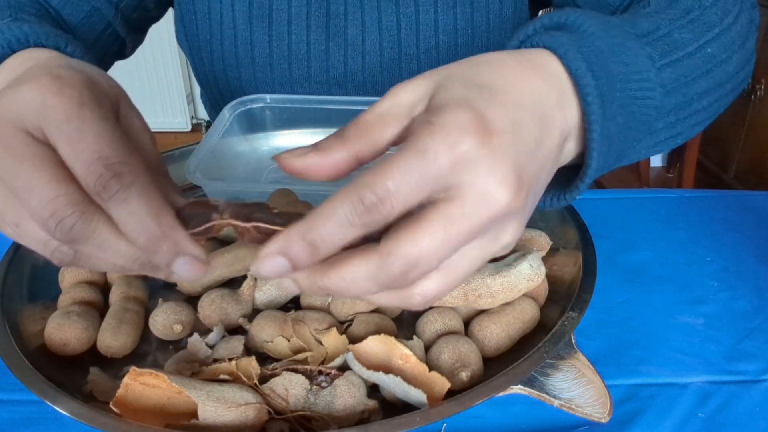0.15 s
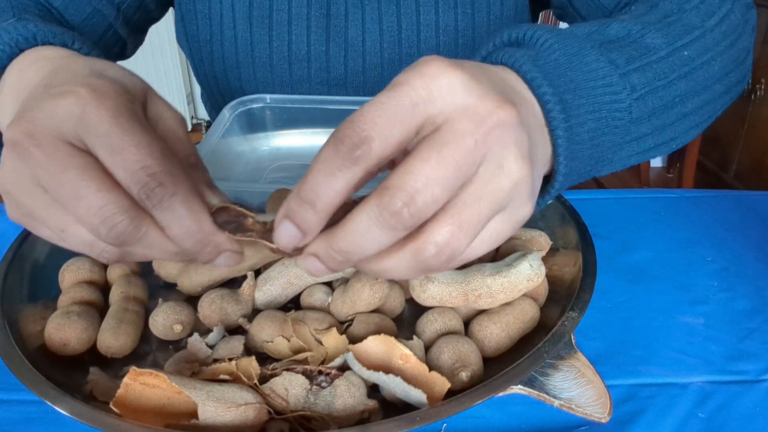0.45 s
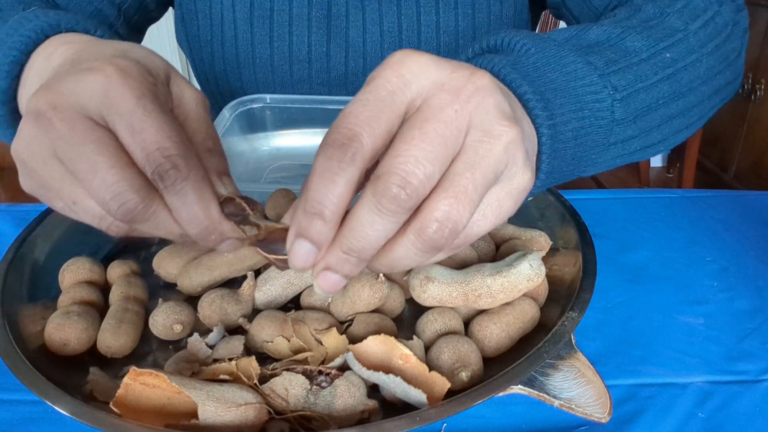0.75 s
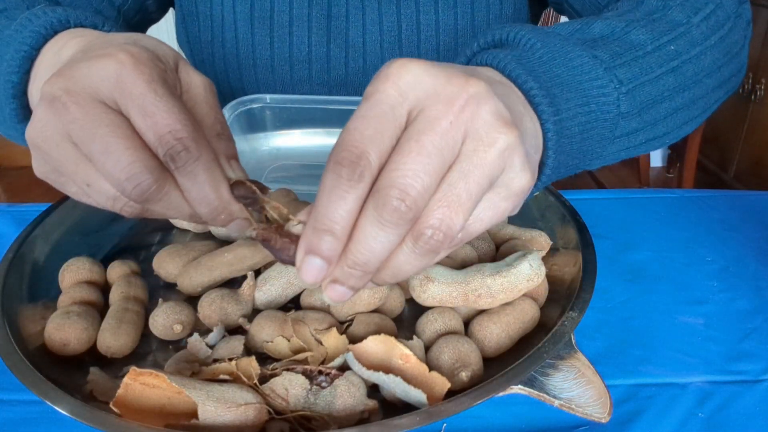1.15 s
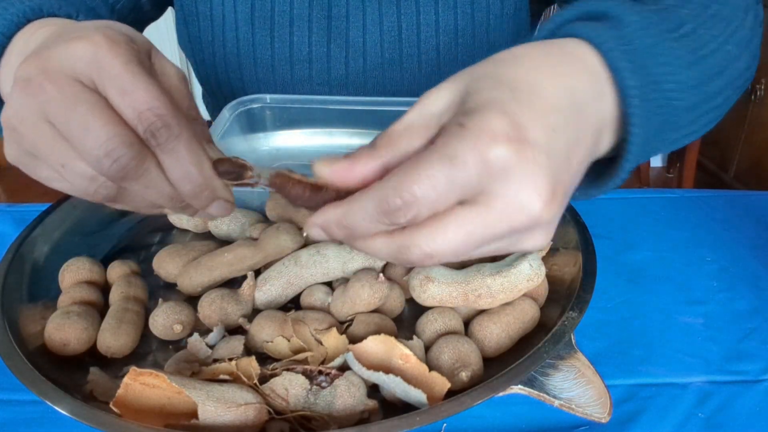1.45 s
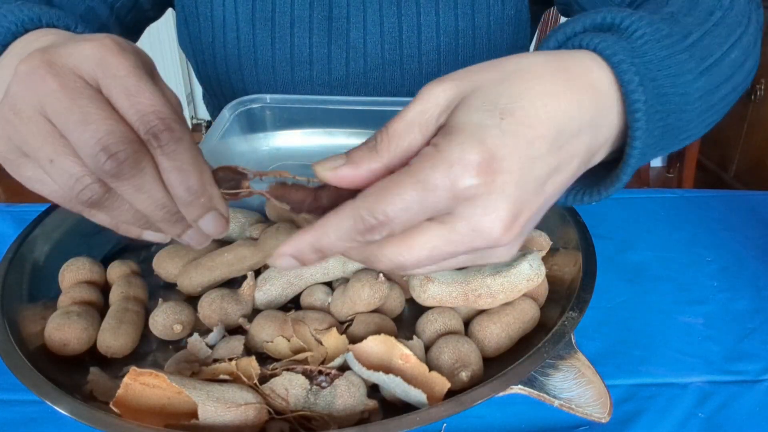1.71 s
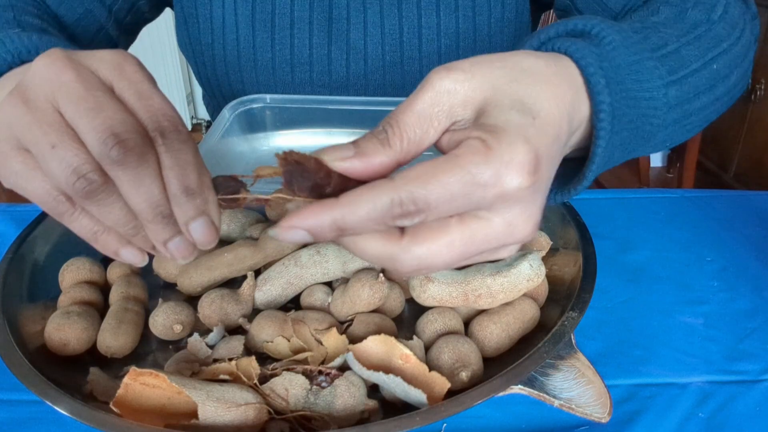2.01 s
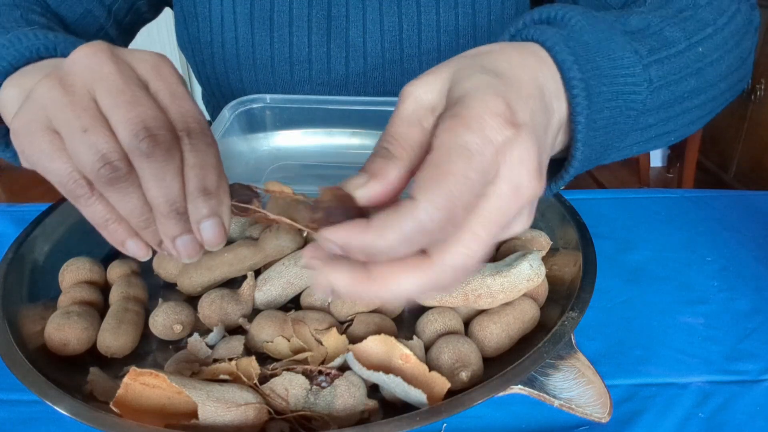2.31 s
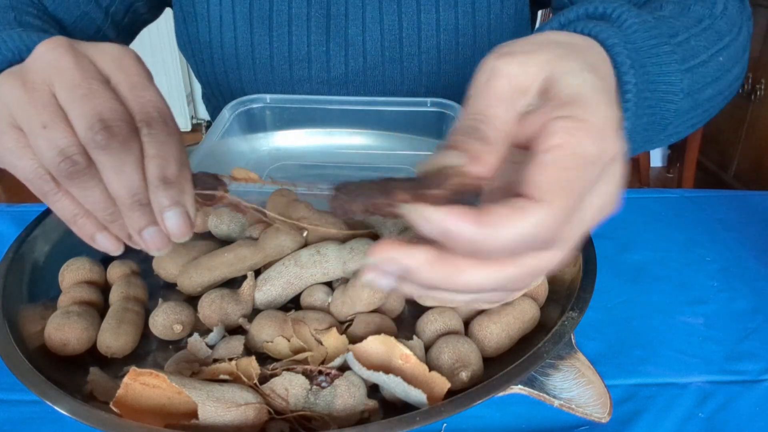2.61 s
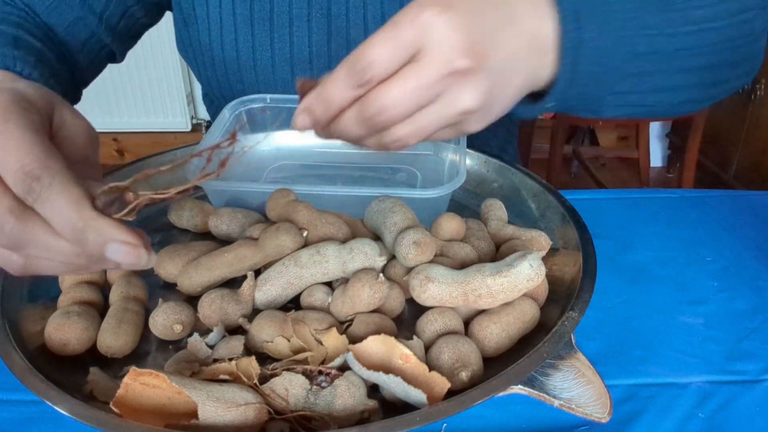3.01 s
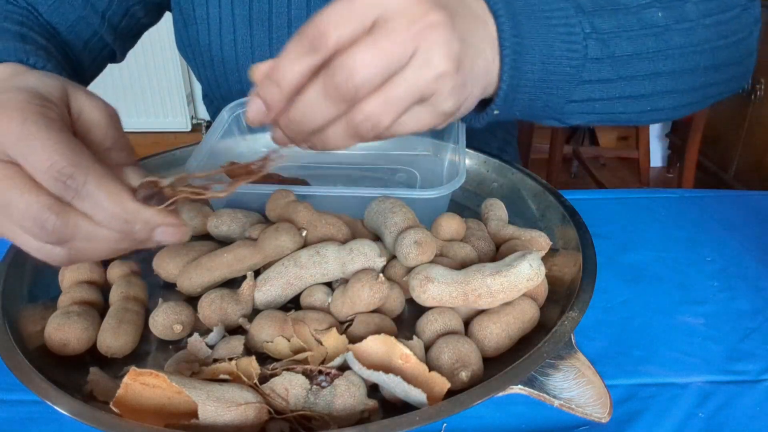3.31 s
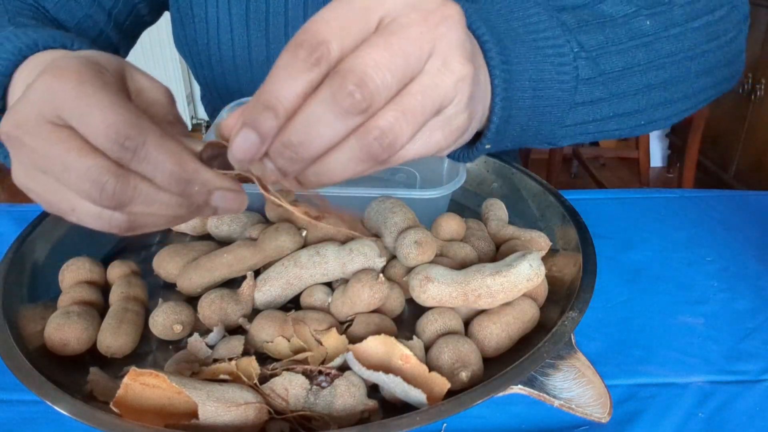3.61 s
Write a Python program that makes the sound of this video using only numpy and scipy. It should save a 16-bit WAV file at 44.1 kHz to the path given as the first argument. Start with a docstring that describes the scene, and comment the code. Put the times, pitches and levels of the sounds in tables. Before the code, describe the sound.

Brittle pod shells crack under fingers, close up in stereo in a small kitchen. Faint ticks come at 0.3 s, light snaps around 0.9-1.2 and 2.05 s, then the sharpest cracks at 2.4 and 2.65-2.7 s with dry crumbling. At 3.3 s a hard object clatters rapidly on steel, slightly farther off, ringing briefly. Low hum and soft room noise continue underneath throughout.

```python
"""A small kitchen: fingers crack and peel brittle pod shells close to a stereo microphone.
Each crack is a sharp snap with short splinter noise, then crumbling noise. Near the end something
hard drops and clatters on steel, a little way off: noise bursts, and decaying modes that ring out.
A refrigerator-like hum and a slow fan (sines) and soft room noise (shaped noise) lie underneath."""
import sys
import numpy as np
from scipy import signal
from scipy.io import wavfile
from scipy.ndimage import uniform_filter1d

SR = 44100
rng = np.random.default_rng(int(sys.argv[2]) if len(sys.argv) > 2 else 0)


def persist_wave(psi):
    """Save psi, clipped to +-1, as 16-bit WAV."""
    counts = np.round(np.clip(psi, -1, 1) * 32767).astype(np.int16)
    wavfile.write(sys.argv[1], SR, np.atleast_2d(counts).T)


N = 165375

# Mains hum: (frequency [Hz], rms level [dB])
HUM = [(49.04, -73), (99.93, -62.5), (199.9, -78.5)]
# Fan harmonics: (multiple of FAN_HZ, rms level [dB])
FAN = [(4, -88), (5, -78), (7, -78), (8, -91.5), (10, -82.5), (11, -82), (13, -86.5), (14, -86), (16, -83)]
FAN_HZ = 32.65
HUM_WAVER_DB, LOW_HUM_WAVER_DB = -0.63, 1.5   # the low one is for tones under 60 Hz

# Spectrum of the room noise: (frequency [Hz], relative level per hertz [dB])
AIR = [(25, -45.5), (45, -6.5), (70, -6.5), (100, 1.5), (160, -5), (300, -8.5), (520, -13), (800, -21),
       (1500, -26.5), (3000, -34), (6500, -37.5), (8500, -44), (15500, -45)]
AIR_DB = -66.5   # rms level

# Left-right likeness of diffuse sound: (frequency [Hz], correlation [-1 to 1])
LIKENESS = [(60, 0.68), (130, 0.97), (290, 0.67), (640, -0.11), (1410, -0.086), (3100, -0.095),
            (6820, -0.069), (15000, 0.028)]
EDGES = 22 * 2 ** np.arange(0, 9.8, .4)   # band edges of diffuse sound [Hz]

# Reverberation of the room: (frequency [Hz], time to fall 60 dB [s])
ROOM_T60 = [(100, 0.52), (500, 0.46), (1500, 0.43), (4000, 0.38), (12000, 0.26)]
ROOM_DELAY_S, CLATTER_ROOM_DB, RING_ROOM_DB, CRACK_ROOM_DB = 0.006, -10, -14.5, -18.5

# Blows of the clatter: (time [s], knock level [dB], steel ring level [dB], low thud level [dB])
BLOWS = [(3.324, -32.5, -57, -33), (3.331, -24, -25.5, -22.5), (3.342, -33.5, -46, -33.5),
         (3.352, -25.5, -33.5, -36.5), (3.357, -25, -24.5, -31.5), (3.370, -27, -35.5, -31),
         (3.379, -27.5, -23, -26), (3.388, -36, -41.5, -28), (3.394, -42.5, -36.5, -35.5),
         (3.410, -41, -42.5, -48), (3.428, -50, -53.5, -56)]
# Spectrum of the knocks: (frequency [Hz], relative level per hertz [dB])
KNOCK = [(500, -8.5), (800, -4.5), (1050, -7), (1600, 0), (2600, -2.5), (3600, -11), (4400, -16),
         (5600, -11), (7000, -17.5), (11000, -21.5), (13000, -32), (16000, -38)]
# Spectrum of the thuds: (frequency [Hz], relative level per hertz [dB])
THUD = [(40, -17.5), (75, -24), (130, 9), (230, 3), (450, 5), (700, 4.5), (1200, -21)]
KNOCK_RISE_S, KNOCK_T60_S, THUD_T60_S = 0.0043, 0.067, 0.047   # the thuds share the rise
KNOCK_SPREAD, THUD_SPREAD = 0.92, 0.31   # share of a diffuse sound's left-right difference
GRAIN_DB, GRAIN_HZ = 1.5, 254   # unevenness of the whole burst
PATCH_DB, PATCH_HZ = 4, 40   # each band flickers on its own

# Modes of the steel: (frequency [Hz], relative level [dB], time to fall 60 dB [s],
# left-right level [dB], growth in strength from earlier to later blows [dB/s])
STEEL = [(234.5, -22, 0.34, 1, -2), (379.6, -20, 0.27, -2, 2), (464, -13.5, 0.07, -0.5, -2),
         (631, -13, 0.094, -1, -6), (1235, -21.5, 0.42, 4.5, -6.5), (1277, -15.5, 0.085, -3.5, 1.5),
         (1626, -10.5, 0.075, 8.5, -6), (1776.5, -15, 0.63, 1.5, 15), (1805, -16.5, 0.14, 11, -6),
         (2368, -1, 0.15, -4, 22), (2400, -18, 0.4, 7.5, -4), (2430, -7.5, 0.13, -11.5, 13),
         (2500, -14.5, 0.24, -2.5, -1.5), (2640, -10, 0.2, -8, 48), (2954, -14.5, 0.23, 11.5, -3),
         (2966, -12, 0.18, -11, 48), (3886, -25, .25, 6.5, 2), (4065, -21.5, 0.15, -8.5, -5),
         (4180, -15, 0.11, 12, 19.5), (4630, -21.5, 0.15, 11, 8.5)]
MODE_SCATTER_DB, RING_RISE_S = 2, 0.0046
FULL_TURN_HZ = 2150   # from here up the ports hear a mode a quarter cycle apart
RATTLE_RAD, RATTLE_HZ = .4, 25
RATTLE_T60_S = .25   # the rattling settles after the last blow and the ring clears
FADE_S, FADE_DB_PER_S, FADE_DEPTH_DB = 3.64, -250, -8   # the clatter's tail sinks by a step

# Shell cracks, each sounding CRACK_OFFSET_S after its listed time:
# (time [s], relative level [dB], brightest pitch [Hz], middle part re brightest [dB],
# dull part re brightest [dB], crumbling gain [dB], left-right level [dB])
CRACKS = [(0.3167, -64.5, 4260, 4, -30, -31, 2), (0.3599, -65.5, 9000, -8, -20, -21, -1),
          (0.768, -69, 5500, -26, -25, -25, 0), (0.8688, -47.5, 12200, -20, -23, -28, 0),
          (0.9238, -60, 14700, -22, -20, -19, 1.5), (0.9926, -59, 12600, -11, -15, -23, -1.5),
          (1.078, -48.5, 10500, -36, -25, -28, 0.5), (1.1144, -72, 6650, -17, -18, -25, 2),
          (1.1762, -66.5, 11500, -13, -20, -23, 0), (1.233, -50.5, 12900, -27, -24, -29, 1),
          (1.4875, -75, 6430, -17, -13, -25, 5), (2.0475, -46, 9800, -12.5, -15.5, -25, 1),
          (2.3537, -69, 9800, -11, -2, -7, 0.5), (2.4209, -33.5, 11200, -13.5, -20, -26, 0.5),
          (2.6477, -37.5, 7600, -21, -21.5, -21, 0), (2.6721, -36, 11700, -18, -22, -26, -1),
          (2.6973, -53, 11900, -19, -20, -13.5, 2.5), (2.7138, -67.5, 14000, 5, 2, -16, -5),
          (2.966, -71.5, 12200, -11, -20, -3.5, 0), (2.977, -74, 12200, -11, -18, -18, 2),
          (3.6995, -62, 15100, -17, -25, -14, -5)]
CRACK_OFFSET_S = 0.0011
EARLIER_CRACK_S, EARLIER_CRACK_DB = 0.015, -44   # this long before the start; only its tail is heard
LEAD_IN_S, LEAD_IN_DB_PER_S = .004, 5004   # very short noise ahead of the snap
SPLINTER_DB, SNAP_T60_S, SNAP_Q, SNAP_BROAD_DB = -19, 0.017, 1.8, -1
CRUMBLE_RISE_S, CRUMBLE_T60_S, CRUMB_DB, DULL_TAIL_DB = 0.0067, 0.1, 2, 0.5
DULL_LOW_HZ, DULL_HIGH_HZ, MIDDLE_HIGH_HZ = 635, 2250, 6500
LEFT_LAG_S = .00018   # the hands are nearer the right port
DULL_LAG_S = .00006   # left lag of the two lower registers

MIC_LOW_HZ, CUTOFF_HZ = 40.3, 16200


def amp(db):
    """Level: 20 dB is a factor of ten in amplitude."""
    return 10 ** (np.asarray(db) / 20)


def rms_one(x):
    """Normalisation to unit root-mean-square."""
    return x / np.sqrt(np.mean(x ** 2) + 1e-20)


def at_hz(points, hz):
    """Interpolation of a curve along logarithmic frequency."""
    points = np.array(points)
    return np.interp(np.log(hz), np.log(points[:, 0]), points[:, 1])


def drift(rate):
    """Slow random wander: white noise through a two-pole low-pass at rate [Hz], unit rms."""
    step = 40   # samples between the points of the wander
    r = np.exp(-2 * np.pi * rate * step / SR)
    white = rng.standard_normal(N // step + 2002)
    slow = signal.lfilter([1], [1, -2 * r, r * r], white)[2000:]
    return np.interp(np.arange(N) / step, np.arange(len(slow)), rms_one(slow))


def band(x, low_hz, high_hz):
    """Band-pass filtering between two frequencies."""
    sos = signal.butter(2, [low_hz, min(high_hz, .45 * SR)], "band", fs=SR, output="sos")
    return signal.sosfilt(sos, x)


def dying(t, t60):
    """Exponential decay from t = 0, losing 60 dB in t60; silence before."""
    return (t >= 0) * amp(-60 * np.maximum(t, 0) / t60)


def diffuse(size, gain, spread=1):
    """Partial coherence: in each band, mid and side noise are mixed to the wanted correlation."""
    settle = 8000   # samples for the filters to settle
    white = rng.standard_normal((2, 2, size + settle))
    out = 0
    for k, (low, high) in enumerate(zip(EDGES, EDGES[1:])):
        # neighbouring bands use different noise
        mid, side = band(white[k % 2], low, high)[:, settle:]
        hz = np.sqrt(low * high)
        alike = np.clip(1 - spread * (1 - at_hz(LIKENESS, hz)), -1, 1)
        out = out + gain(hz) * (np.sqrt(1 + alike) * mid + np.sqrt(1 - alike) * side * [[1], [-1]])
    return out


def air():
    """Stationary diffuse noise: room noise with a fixed spectrum."""
    return amp(AIR_DB) * rms_one(diffuse(N, lambda hz: amp(at_hz(AIR, hz))))


def hum():
    """Periodic sources: mains and fan tones are sums of sines whose levels waver a little."""
    t = np.arange(N) / SR
    fan = [(k * FAN_HZ, db) for k, db in FAN]
    out = 0
    for hz, db in list(HUM) + fan:
        waver = LOW_HUM_WAVER_DB * drift(0.19) if hz < 60 else HUM_WAVER_DB * drift(1.3)
        # sqrt(2) turns rms into peak
        out = out + np.sqrt(2) * amp(db + waver) * np.sin(2 * np.pi * (hz * t + rng.random()))
    return out


def room(x):
    """Reverberation: convolution with a unit-energy diffuse tail whose bands decay at their own rates."""
    t = np.arange(SR // 2) / SR - ROOM_DELAY_S

    def decay(hz):
        t60 = at_hz(ROOM_T60, hz)
        return dying(t, t60) / np.sqrt(t60)

    tail = diffuse(len(t), decay)
    tail = tail / np.sqrt(np.sum(tail ** 2) / 2)
    return signal.fftconvolve(x[None], tail, axes=1)[:, :N]


def bursts(column, spectrum, t60, spread):
    """Impact noise: each blow excites a short burst of rattling, spectrally shaped noise."""
    t = np.arange(N) / SR
    shape = 0
    for blow in BLOWS:
        since = t - blow[0]
        rise = np.clip(since / KNOCK_RISE_S, 0, 1) ** 2
        shape = shape + amp(blow[column]) * rise * dying(since, t60)
    grain = amp(GRAIN_DB * drift(GRAIN_HZ))
    noise = diffuse(N, lambda hz: amp(at_hz(spectrum, hz) + PATCH_DB * drift(PATCH_HZ)), spread)
    return shape * grain * rms_one(noise)


def clatter():
    """Superposition of the bright knocks and low thuds of the same blows."""
    knocks = bursts(1, KNOCK, KNOCK_T60_S, KNOCK_SPREAD)
    return knocks + bursts(3, THUD, THUD_T60_S, THUD_SPREAD)


def steel():
    """Modal vibration: every blow adds energy to every damped mode; rattling shakes the phase."""
    s, _, ring_db, _ = np.transpose(BLOWS)
    first = int(s[0] * SR)
    out = np.zeros((2, N))
    t = np.arange(first, N) / SR
    since = t - s[:, None]
    scatter = rng.normal(0, MODE_SCATTER_DB, (len(BLOWS), len(STEEL)))
    rise = np.clip(since / RING_RISE_S, 0, 1)
    settling = amp(-60 * np.maximum(t - s[-1], 0) / RATTLE_T60_S)
    for k, (hz, db, t60, pan_db, later_db) in enumerate(STEEL):
        struck = amp(db + ring_db + later_db * (s - s.mean()) + scatter[:, k])[:, None]
        height = np.sqrt(np.sum((struck * rise * dying(since, t60)) ** 2, axis=0))
        # the two ports hear the mode at opposite phase offsets
        turn = np.pi / 4 * min(hz / FULL_TURN_HZ, 1) * (-1) ** k * np.array([[1], [-1]])
        phase = 2 * np.pi * (hz * t + rng.random())
        rattle = RATTLE_RAD * drift(RATTLE_HZ)[first:] * settling
        pan = amp(pan_db * np.array([[.5], [-.5]]))
        out[:, first:] += pan * height * np.sin(phase + rattle + turn)
    return out


def snap(t, grit, hz, middle_db, dull_db):
    """Brittle fracture: an impulse with short splinter noise, band-passed into peak-scaled registers."""
    lead_in = amp(LEAD_IN_DB_PER_S * np.minimum(t, 0) - 2.0)
    shape = np.where(t < 0, lead_in, dying(t, SNAP_T60_S))
    click = (t == 0) + amp(SPLINTER_DB) * grit * shape
    w = 2 ** (.5 / SNAP_Q)
    bright = band(click, hz / w, hz * w) + amp(SNAP_BROAD_DB) * band(click, MIDDLE_HIGH_HZ, 21800)
    middle = band(click, DULL_HIGH_HZ, MIDDLE_HIGH_HZ)
    dull = band(click, DULL_LOW_HZ, DULL_HIGH_HZ)
    levels = zip([0, middle_db, dull_db], [bright, middle, dull])
    return [amp(db) * part / abs(part).max() for db, part in levels]


def crumbling(t, grit, lump_noise, middle_db, crumble_db):
    """Granular friction: lumpy band-passed noise swells after the snap and dies."""
    lower = amp(middle_db + DULL_TAIL_DB) * band(grit, DULL_LOW_HZ, MIDDLE_HIGH_HZ)
    hiss = band(grit, 4050, 12000) + lower
    lumps = amp(CRUMB_DB * rms_one(uniform_filter1d(lump_noise, size=90)))
    swell = np.clip(t / CRUMBLE_RISE_S, 0, 1) ** 2
    return amp(crumble_db) * hiss * lumps * swell * dying(t, CRUMBLE_T60_S)


def cracks():
    """Arrival time and level differences: each crack reaches the right port first, at its own balance."""
    lead, before = SR // 10, int(LEAD_IN_S * SR)
    t = (np.arange(SR // 6) - before) / SR
    out = np.zeros((2, N + SR))
    earlier = (-EARLIER_CRACK_S, EARLIER_CRACK_DB, 6500, -4, -16, -13, 0)
    for s, db, hz, middle_db, dull_db, crumble_db, pan_db in [earlier] + list(CRACKS):
        grit = rng.standard_normal((5, len(t)))
        top, middle, dull = snap(t, grit[:2], hz, middle_db, dull_db)
        crumbs = crumbling(t, grit[2:4], grit[4], middle_db, crumble_db)
        for c in (0, 1):   # left, right
            # the middle register has inverted polarity
            for part, lag in [(top + crumbs, LEFT_LAG_S), (dull - middle, DULL_LAG_S)]:
                i = lead - before + int((s + CRACK_OFFSET_S + lag * (1 - c)) * SR)
                out[c, i:i + len(t)] += amp(db + 5.0 + pan_db * (1.5 - c)) * part[c]
    return out[:, lead:lead + N]


def scene():
    """Superposition of direct sound, reverberation and background."""
    noise = air()
    shells, ring, blows = cracks(), steel(), clatter()
    # the right channels feed the room
    send = amp(CRACK_ROOM_DB) * shells[1] + amp(CLATTER_ROOM_DB) * blows[1] + amp(RING_ROOM_DB) * ring[1]
    wet = room(send)
    fade = amp(np.clip(FADE_DB_PER_S * (np.arange(N) / SR - FADE_S), FADE_DEPTH_DB, 0))
    return shells + (blows + ring + wet) * fade + hum() + noise


def record(dry):
    """Band limiting: a high-pass cuts the deepest bass and a steep low-pass the top."""
    dry = signal.sosfilt(signal.butter(4, MIC_LOW_HZ, "high", fs=SR, output="sos"), dry)
    return signal.sosfilt(signal.cheby2(16, 50, CUTOFF_HZ, fs=SR, output="sos"), dry)


dry = scene()
out = record(dry)
persist_wave(out)
```